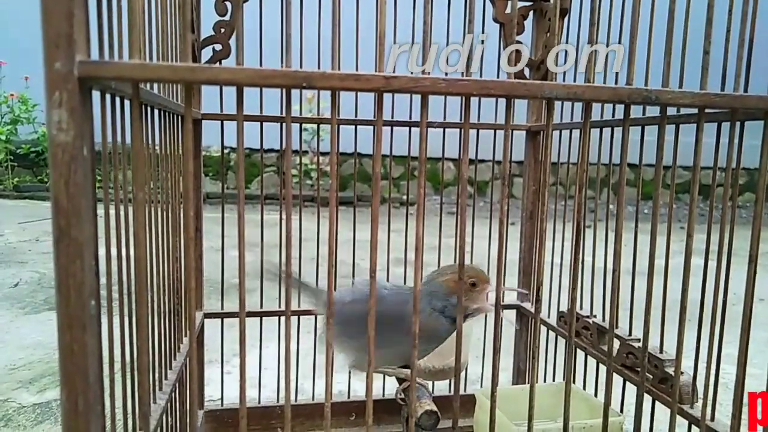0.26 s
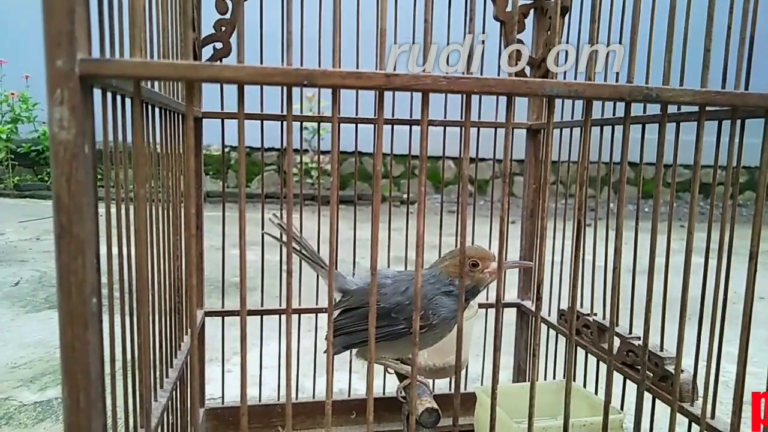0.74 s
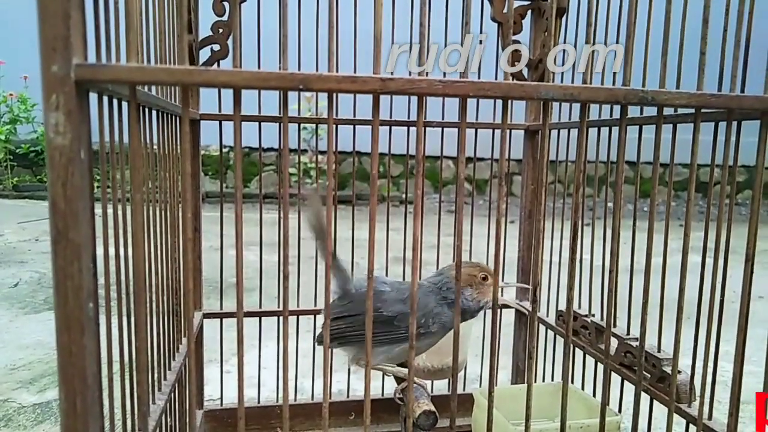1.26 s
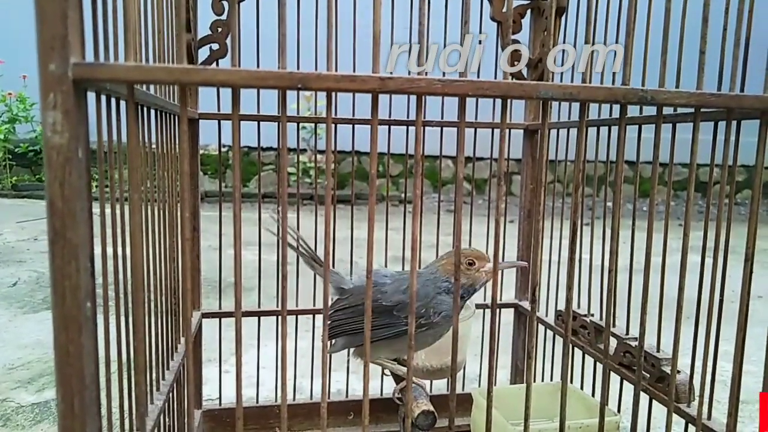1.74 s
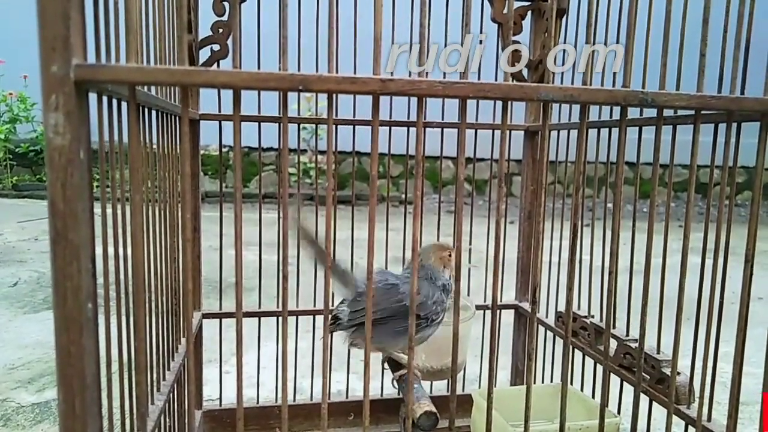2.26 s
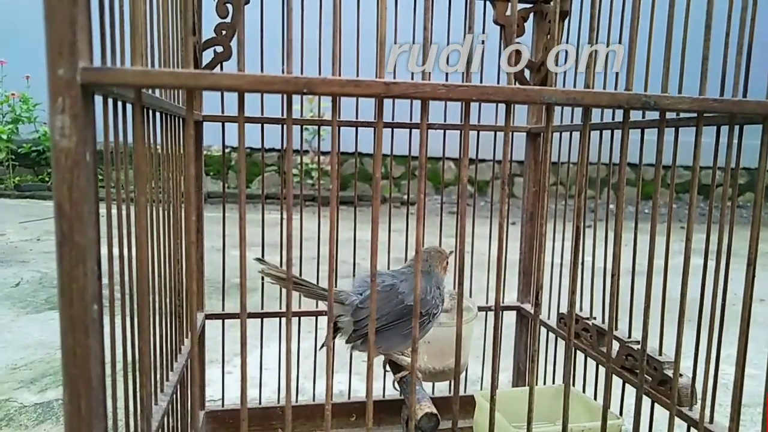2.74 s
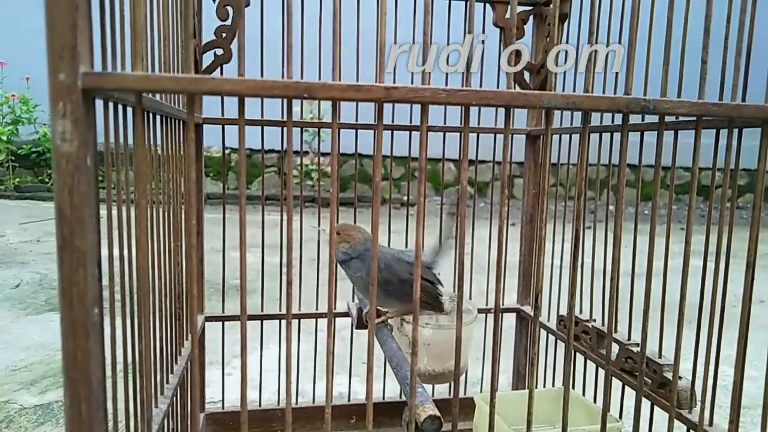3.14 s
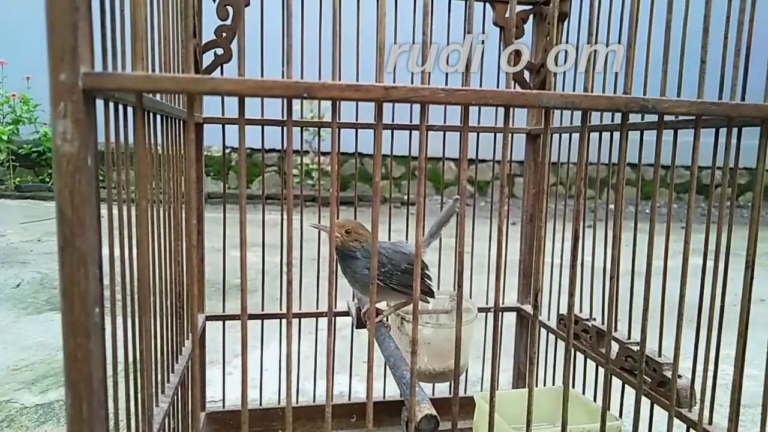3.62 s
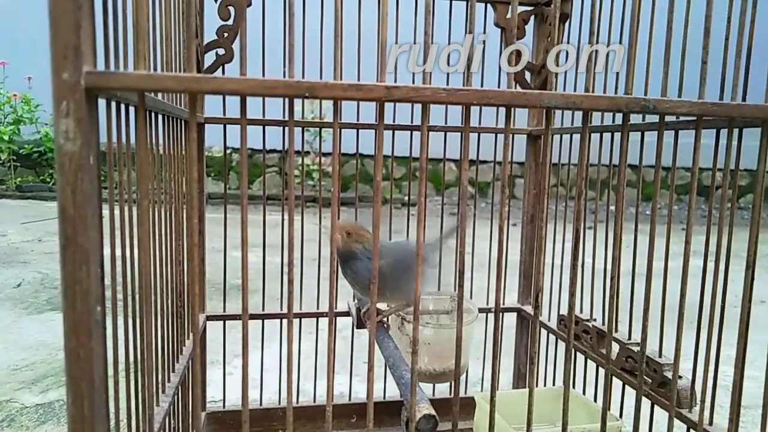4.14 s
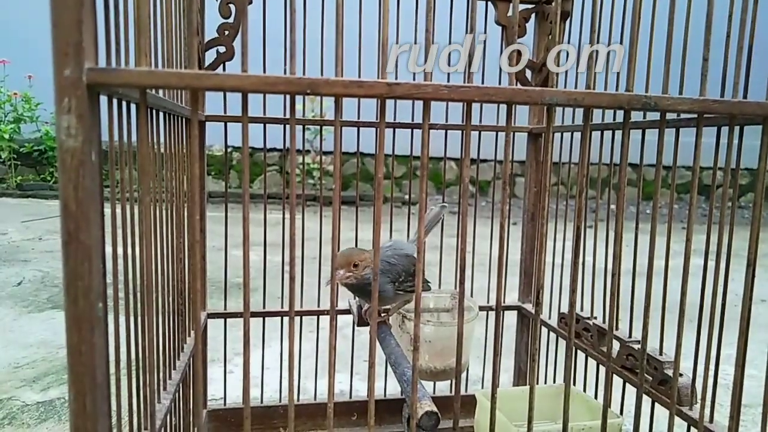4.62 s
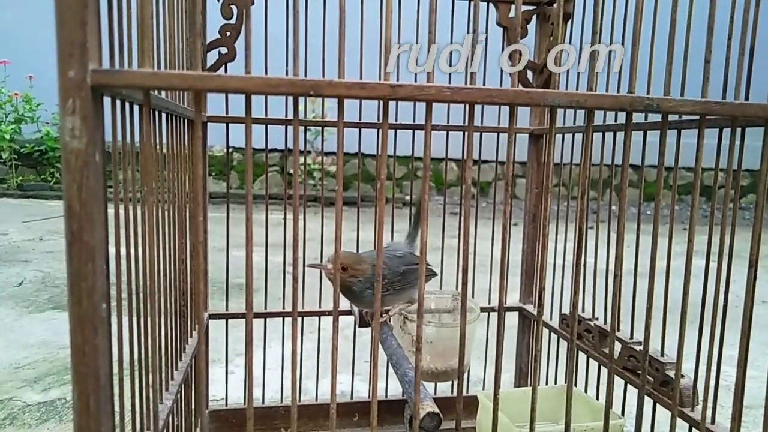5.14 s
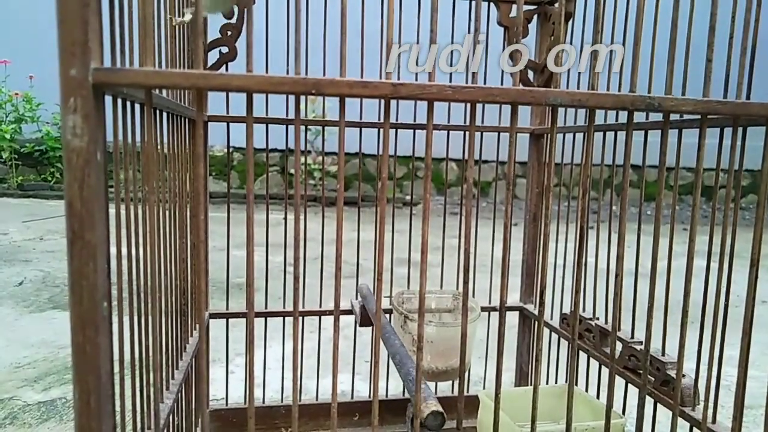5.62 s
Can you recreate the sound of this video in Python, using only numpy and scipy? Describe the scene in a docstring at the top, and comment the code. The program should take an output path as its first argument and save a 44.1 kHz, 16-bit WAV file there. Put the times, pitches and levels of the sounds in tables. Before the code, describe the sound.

Five sharp, evenly spaced phrases come from a songbird in a cage outdoors, each a few tiny clicks, a rising note, a pip and a loud falling whistle, close enough to sound slightly overdriven. A rooster crows far off during the first half, and a distant vehicle swells and fades over a low town rumble and faint chirping. After the last phrase come a faint rising yelp, a soft flutter and two light claw taps.

```python
"""A caged tailorbird in a walled yard sings five times, close to a phone: three bill snaps, then a dip,
a rising held note, a pip and a loud downward slide. Its gliding tones carry a rasp of air and a bright,
overdriven edge from the microphone; cage and walls echo them. Wings rustle and claws tap as it moves.
Behind it: a far rooster, wild birds, a thin steady chirping, low town rumble and one far vehicle."""
import sys
import numpy as np
from scipy import signal
from scipy.fft import rfft, irfft
from scipy.io import wavfile
from scipy.ndimage import uniform_filter1d

SR = 44100
rng = np.random.default_rng(int(sys.argv[2]) if len(sys.argv) > 2 else 0)


def transcribe(signal):
    """Save signal, clipped to [-1, 1], as a 16-bit WAV file at the path in sys.argv[1]."""
    frames = np.atleast_2d(signal).T
    limited = np.clip(frames, -1, 1)
    pcm = np.round(limited * 32767).astype(np.int16)
    wavfile.write(sys.argv[1], SR, pcm)


N = 259308
T = np.arange(N) / SR


def tailorbird():
    """Bill snaps and four kinds of note, reflected by the cage and echoed by the yard."""
    # Each row: start in s, length in s, pitch factor at start, middle and end, then evenly spaced dB.
    dip_rows = [(0.196, 0.022, 1.06, 1.04, 0.91, -41.5, -22.0, -27, -23.5, -27.5, -36.5),
                (1.246, 0.023, 1.025, 0.91, 1.06, -39.5, -20, -29.5, -23, -29.5, -34),
                (2.257, 0.025, 1.02, 0.94, 1.07, -43.5, -19.5, -35, -34, -30.5, -46.5),
                (3.215, 0.021, 1.051, 1.04, 0.98, -53, -19, -26, -24.5, -34.5, -24),
                (4.333, 0.024, 1.15, 1, 0.86, -47.5, -24, -29, -23.5, -49.5, -31.5)]
    hold_rows = [(0.2355, 0.081, 1.01, 0.99, 1.005, -42.0, -30.0, -18.0, -27.0, -26.0, -25.0, -25.0, -23.0, -23.0, -20.0, -24.0, -30.0),
                 (1.2875, 0.075, 0.941, 1.007, 1.013, -38.0, -30.0, -17.0, -31.0, -23.0, -22.0, -23.0, -21.0, -21.0, -21.0, -21.0, -32.0),
                 (2.298, 0.076, 0.95, 1.03, 1.01, -54.0, -30.0, -17.0, -29.0, -35.0, -40.0, -35.0, -35.0, -26.0, -29.0, -27.0, -22.0),
                 (3.2585, 0.073, 1.041, 0.996, 1.023, -44.0, -27.0, -15.0, -23.0, -23.0, -27.0, -25.0, -23.0, -19.0, -19.0, -26.0, -20.0),
                 (4.374, 0.078, 1.04, 0.992, 0.995, -41.0, -27.0, -19.0, -21.0, -21.0, -24.0, -20.0, -20.0, -19.0, -16.0, -28.0, -22.0)]
    pip_rows = [(0.348, 0.022, 0.985, 0.994, 1.02, -26.0, -12.0, -16.0, -18.0, -37.0),
                (1.398, 0.02, 1.014, 1.004, 1.01, -38.0, -17.0, -17.0, -19.0, -44.0),
                (2.411, 0.023, 0.975, 1.002, 1.016, -30.0, -13.0, -14.0, -20.0, -33.0),
                (3.366, 0.028, 1.033, 1.013, 1.013, -31.0, -30.0, -29.0, -24.0, -31.0),
                (4.4875, 0.021, 1.021, 0.977, 0.994, -31.0, -15.0, -18.0, -21.0, -33.0)]
    slide_rows = [(0.382, 0.06, 1.01, 1.004, 0.985, -17.0, -16.0, -18.0, -16.0, -30.0, -25.0, -16.0, -27.0, -22.0, -42.0),
                  (1.432, 0.063, 0.98, 1.014, 1.01, -19.0, -14.0, -17.0, -16.0, -29.0, -23.0, -15.0, -25.0, -22.0, -35.0),
                  (2.444, 0.064, 0.99, 1.022, 0.975, -18.0, -15.0, -18.0, -13.0, -28.0, -23.0, -17.0, -23.0, -23.0, -31.0),
                  (3.401, 0.059, 1.015, 1.021, 1.03, -17.0, -15.0, -14.0, -20.0, -20.0, -16.0, -15.0, -12.0, -39.0, -17.0),
                  (4.521, 0.064, 1.005, 1.004, 0.99, -30.0, -15.0, -12.0, -21.0, -24.0, -27.0, -19.0, -28.0, -29.0, -32.0)]
    # Base pitch, evenly spaced over the note.
    dip_hz = [4320, 2780, 2550, 2196, 1850, 1890]
    hold_hz = [1000, 1850, 3000, 3380, 3530, 3510, 3470, 3450, 3420, 3380, 3320, 3270, 3250]
    pip_hz = [4030, 3960, 3950, 3950]
    slide_hz = [4880, 4550, 4100, 3650, 3200, 2980, 2850, 2730, 2650]
    # Bright edge. Each row: pitch multiple, relative dB.
    # Odd multiples: microphone overload. Half multiples: the syrinx doubles its period.
    dip_edge = [(2, -29.5), (3, -34), (4, -47.5), (5, -51.5)]
    hold_edge = [(.5, -41), (1.5, -30.5), (2, -26), (2.5, -46), (3, -41), (4, -41), (4.5, -39.5)]
    pip_edge = [(1.5, -40.5), (2, -26.5), (2.5, -38.5), (3, -23.5), (3.5, -50.5), (4, -43)]
    slide_edge = [(2, -27), (3, -26), (4, -29.5), (5, -17)]
    # Cage floor and frame. Each row: delay in s, gain in dB.
    reflections = [(.0019, -20), (.0032, -14)]
    snaps = bill_snaps()
    dips, dips_send = notes(dip_rows, dip_hz, dip_edge, jitter=.01, rasp_db=-19, fade_s=.002)
    holds, holds_send = notes(hold_rows, hold_hz, hold_edge, jitter=.0073, rasp_db=-27, fade_s=.0053)
    pips, pips_send = notes(pip_rows, pip_hz, pip_edge, jitter=.0043, rasp_db=-39, fade_s=.001)
    slides, slides_send = notes(slide_rows, slide_hz, slide_edge,
                                jitter=.0079, rasp_db=-20.5, fade_s=.002)
    song = snaps + dips + holds + pips + slides
    cage = sum(undb(db) * np.interp(T - delay_s, T, song, left=0) for delay_s, db in reflections)
    send = undb(-13.5) * snaps + undb(-10.5) * dips_send + undb(-17) * pips_send
    send += undb(-15) * (holds_send + slides_send)
    return song + cage + yard(send, t60_s=.35, gap_s=.005)


def notes(rows, shape_hz, edge_partials, jitter, rasp_db, fade_s):
    """Gliding tones with a bright, overdriven edge from the microphone, fading toward each note's end."""
    # Each row: frequency in Hz, gain in dB. The peak near 15 kHz is microphone resonance.
    mic_colour = [(5500, -10), (8000, 3.5), (9500, -8), (10800, -26), (12000, -13), (13700, 7),
                  (15000, 4.5), (16300, -8)]
    rasp_colour = [(700, -25.5), (2500, -9.5), (5500, -7.5), (8000, 2.5), (9500, -10.5), (11000, -26.5),
                   (12500, -17), (14000, 6), (15300, 9), (16500, -5)]
    # Edge and rasp vary from phrase to phrase. Each row: time in s, gain in dB.
    brightness = [(.3, 2.5), (1.35, 2.5), (2.4, 0), (3.3, -2.5), (4.4, 3)]
    direct, send = np.zeros(N), np.zeros(N)
    for start_s, length_s, first, middle, last, *levels_db in rows:
        n = int(length_s * SR)
        u = np.linspace(0, 1, n)
        along = lambda values: np.interp(u, np.linspace(0, 1, len(values)), values)
        hz = uniform_filter1d(along(shape_hz), size=90, mode="nearest") * along([first, middle, last])
        hz *= 1 + jitter * walk(1500, size=8192)[:n]
        phase = 2 * np.pi * np.cumsum(hz) / SR
        edge = sum(undb(db) * gain_at(k * hz, mic_colour) * (k * hz < SR / 2) * np.sin(k * phase)
                   for k, db in edge_partials)
        rasp = undb(rasp_db) * (1 - u) ** 3 * noise(rasp_colour, size=8192)[:n]
        bright_gain = undb(np.interp(start_s, *np.transpose(brightness)))
        tone = np.sin(phase) + bright_gain * (undb(-18 * u ** 4) * edge + rasp)
        gate = np.sin(np.pi / 2 * np.clip(np.minimum(u, 1 - u) * length_s / fade_s, 0, 1)) ** 2
        note = np.sqrt(2) * gate * tone
        # The close sound flutters in level from echo interference; a smoothed level feeds the yard echo.
        direct_db = along(levels_db)
        send_db = uniform_filter1d(direct_db, size=n // 2, mode="reflect")
        add(direct, start_s, undb(direct_db) * note)
        add(send, start_s, undb(send_db) * note)
    return direct, send


def bill_snaps():
    """The bill claps shut three times before each phrase."""
    # Each row: start in s, relative peak in dB.
    snaps = [(0.0973, -30), (0.1126, -28), (0.1277, -29), (1.145, -26), (1.1598, -22), (1.1744, -29),
             (2.165, -33.5), (2.1785, -29.5), (2.1936, -29.5), (3.132, -32), (3.1475, -35), (3.1623, -30),
             (4.2339, -35), (4.249, -22.5), (4.265, -27)]
    # Each row: frequency in Hz, gain in dB.
    colour = [(300, -38.5), (900, -15.5), (1700, -1.5), (2800, -12.5), (4200, -6.5), (6000, 5), (7700, -7),
              (9500, -31), (11500, -28), (14200, -10), (16000, -16)]
    return undb(2) * clicks(snaps, colour, fall_s=.0013, ring_db=-16, ring_s=.005)


def wings():
    """Feathers rustle in quick strokes."""
    # Each row: start in s, length in s, level in dB.
    strokes = [(2.722, 0.086, -55), (5.39, .11, -66), (5.574, 0.055, -67), (5.632, 0.054, -58.5)]
    swell = sum(undb(db) * np.sin(np.pi * np.clip((T - start_s) / length_s, 0, 1))
                for start_s, length_s, db in strokes)
    feathers = noise([(300, -12), (2000, -21), (5500, -24), (8000, -10),
                      (11000, -22), (14500, -13), (17000, -10)])
    return swell * feathers * undb(1.44 * walk(40))


def claws():
    """Claws tap the wooden perch and bars."""
    # Each row: start in s, peak in dB.
    taps = [(5.582, -49), (5.622, -48)]
    wood = [(300, -9.5), (1400, -4), (2500, -14.5), (8000, -24), (16000, -26)]
    return clicks(taps, wood, fall_s=.0027, ring_db=2, ring_s=.024)


def clicks(rows, colour, fall_s, ring_db, ring_s):
    """Small hard contacts: a noise crack and a short ring."""
    out, t = np.zeros(N), T[:2048]
    envelope = np.exp(-t / fall_s) + undb(ring_db) * np.exp(-t / ring_s)
    for start_s, db in rows:
        click = noise(colour, size=len(t)) * envelope
        add(out, start_s + .0014, undb(db) * click / np.abs(click).max())
    return out


def rooster():
    """Far crowing; the hoarse throat spreads a rough band around each harmonic."""
    # The end of a crow, then a whole one. Rows as for far_call.
    crow_end = [(0, 460.6, -63, 2, 0.42), (.1, 475, -63.5, 3, 0.34), (.2, 460.6, -77.5, -0.5, .6),
                (.4, 471.6, -68, 8.5, 1), (.52, 470.6, -60.5, -1.5, 1), (.62, 393, -111, -4, 1)]
    crow = [(.9, 651, -76, -12.5, .3), (1.0, 726, -65.5, 3, .3), (1.12, 803, -63, 0.5, .6),
            (1.3, 804, -61.5, 11, 1), (1.42, 722, -68.5, 1.5, 1), (1.54, 700, -60, -1.5, 1),
            (1.7, 708.4, -65, 1.5, .6), (1.85, 715.4, -55, -8.5, .9), (1.96, 720, -61.5, -3.5, .8),
            (2.15, 727, -58.5, -4, .9), (2.35, 700, -62, -3.5, 1), (2.52, 725, -68.5, 4.5, .4),
            (2.66, 742, -63, 7.5, .15), (2.9, 716, -70, 8.5, .1), (3.1, 693.4, -61.5, 4, .15),
            (3.25, 619.5, -63.5, -0.5, .3), (3.36, 550, -73.5, -3, .5)]
    calls = far_call(crow_end, third_db=-12.5, fourth_db=-3)
    calls += far_call(crow, third_db=-18, fourth_db=-25.5)
    times_s, *_, hoarseness = np.transpose(crow)
    return calls * (1 + undb(-9) * walk(420) * np.interp(T, times_s, hoarseness))


def wild_birds():
    """A rising yelp, short whistles and faint far slurs."""
    # One curve per call. Rows as for far_call.
    calls = [
        [(5.005, 700, -79, 16, .1), (5.025, 892, -64, 2, 0.13), (5.05, 1020, -57, 6, .1),
         (5.085, 1188, -51.5, -8, .1), (5.11, 1230, -53.5, -7, .1), (5.135, 1160, -73, -10, .1)],
        [(.485, 3090, -69, -32, .1), (.502, 3024, -33.5, -19, .1), (.515, 3010, -65, -28, .1)],
        [(.525, 2220, -70, -24, 0.16), (.545, 2150, -48, -35, 0.081), (.572, 1867, -46, -30, 0.063),
         (.585, 1800, -77, -30, .1)],
        [(4.05, 3070, -83.5, -26, .3), (4.12, 2780, -73, -24, .3), (4.2, 2500, -83, -30, .3)],
        [(4.9, 3910, -81, -26, .1), (5.0, 4020, -73, -30.5, .1), (5.07, 4410, -73, -30, .1),
         (5.1, 4550, -82, -30, .1)],
        [(5.15, 2790, -82, -30, .2), (5.22, 3226, -78, -30, 0.17), (5.3, 2580, -75, -32.5, 0.18),
         (5.38, 2422, -84.5, -31, 0.21)],
    ]
    return sum(far_call(call, third_db=-34, fourth_db=-27) for call in calls)


def far_call(curve, third_db, fourth_db):
    """A distant call of four harmonics; hoarseness shakes pitch and level."""
    # Each row: time in s, pitch in Hz, relative level in dB, second harmonic in dB, hoarseness 0-1.
    times_s, *columns = np.transpose(curve)
    t = np.arange(times_s[0], times_s[-1], 1 / SR)
    hz, db, second_db, hoarseness = (np.interp(t, times_s, column) for column in columns)
    shake = (.004 + .085 * hoarseness) * walk(200, size=len(t))
    phase = 2 * np.pi * np.cumsum(hz * (1 + shake)) / SR
    gains = map(undb, [0, second_db, third_db, fourth_db])
    tone = sum(gain * np.sin(k * phase) for k, gain in enumerate(gains, 1))
    out = np.zeros(N)
    add(out, times_s[0], tone * undb(db + 3.6 * hoarseness * walk(70, size=len(t))))
    return out


def chirping():
    """A tiny far caller repeats a pair of thin falling chirps."""
    top_hz, bottom_hz, level_db = 8000, 6240, -63.5
    first_s, period_s, length_s, spacing_s = .064, .1123, .019, .027
    out, u = np.zeros(N), np.linspace(0, 1, int(length_s * SR))
    sweep_hz = bottom_hz + (top_hz - bottom_hz) * (1 - u) ** 2
    for start_s in np.arange(first_s, N / SR, period_s):
        for k, (detune, accent) in enumerate(rng.standard_normal((2, 2))):
            phase = 2 * np.pi * np.cumsum(sweep_hz * (1 + .012 * detune)) / SR
            envelope = undb(level_db + 1.5 * accent) * np.sin(np.pi * u)
            add(out, start_s + k * spacing_s, envelope * np.sin(phase))
    return out


def neighbours():
    """The far callers and their echo off the walls."""
    crows, birds, chirps = rooster(), wild_birds(), chirping()
    direct = undb(-1.5) * (crows + birds) + chirps
    send = undb(-3.5) * crows + undb(-3) * birds + undb(2) * chirps
    return direct + yard(send, t60_s=.19, gap_s=.003)


def yard(x, t60_s, gap_s, treble_db=-1.5):
    """Dense echoes from walls and paving; a little treble is scattered away."""
    t = T[:SR]
    tail = noise([(1500, 0), (5000, .017), (6500, treble_db), (16000, treble_db)], size=SR)
    tail *= undb(-60 * t / t60_s) * np.clip(t / gap_s - 1, 0, 1)
    song_band = np.abs(rfft(tail))[2500:5000]  # 1 Hz bins
    return signal.fftconvolve(x, tail / np.sqrt(np.mean(song_band ** 2)))[:N]


def vehicle():
    """A far vehicle's rumble swells and fades."""
    # Each row: time in s, level in dB.
    swell = [(0, -79.5), (1.6, -82.5), (2.1, -69), (2.45, -64), (2.9, -69.5), (3.3, -79), (5.9, -81)]
    rumble = noise([(60, -11.5), (130, -3.5), (270, -7), (400, -12), (1200, -13.5), (4000, -43)])
    return rumble * undb(np.interp(T, *np.transpose(swell)))


def town(level_db=-56.5):
    """Low rumble and faint hiss, wavering slightly."""
    # Each row: frequency in Hz, relative density in dB.
    colour = [(20, -14), (38, -3.5), (55, 2), (72, -3), (100, -10), (170, -12), (240, -16.5), (320, -25),
              (1000, -30.5), (2500, -34), (5300, -41.5), (8000, -37), (10500, -44), (15000, -37)]
    return noise(colour) * undb(level_db + .6 * walk(4))


def undb(db):
    """Decibels to gain."""
    return 10 ** (np.asarray(db) / 20)


def gain_at(hz, points):
    """Gain of a (Hz, dB) curve on a log-frequency axis."""
    points_hz, db = np.transpose(points)
    return undb(np.interp(np.log(np.maximum(hz, 1)), np.log(points_hz), db))


def noise(points, size=N):
    """Unit noise with a (Hz, dB) colour."""
    gains = gain_at(np.fft.rfftfreq(size, 1 / SR), points)
    y = irfft(rfft(rng.standard_normal(size)) * gains, size)
    return y / y.std()


def walk(rate_hz, size=N):
    """Random wander with a spread near 1."""
    values = rng.standard_normal(size + 2)
    return 1.2 * np.interp(np.arange(size) * min(rate_hz / SR, 1), np.arange(size + 2), values)


def add(out, start_s, sound):
    """Mix a sound in at a time."""
    i = max(int(start_s * SR), 0)
    out[i:i + len(sound)] += sound[:max(N - i, 0)]


def scene():
    """All sources at one microphone."""
    return (tailorbird() + neighbours() + wings() + claws() + vehicle() + town())[None]


def record(dry):
    """The phone cuts the top treble."""
    cutoff_hz = 16300
    return signal.sosfilt(signal.ellip(10, .2, 80, cutoff_hz, fs=SR, output="sos"), dry)


dry = scene()
out = record(dry)
transcribe(out)
```